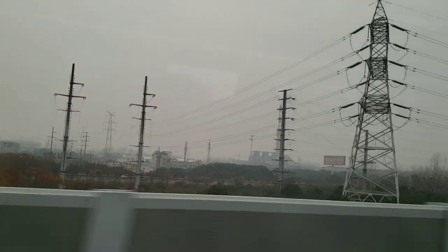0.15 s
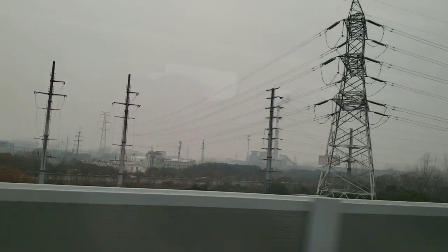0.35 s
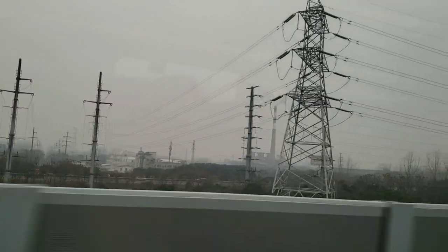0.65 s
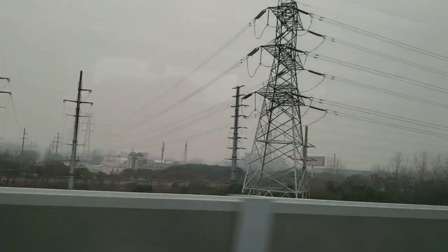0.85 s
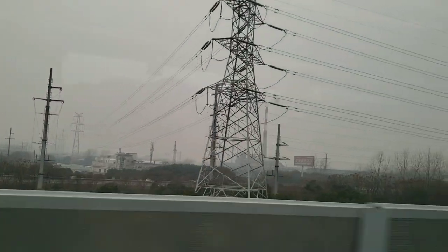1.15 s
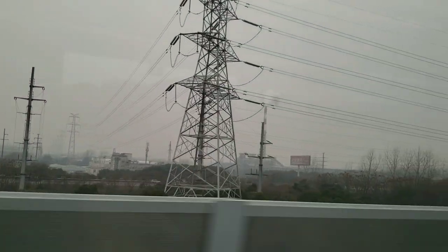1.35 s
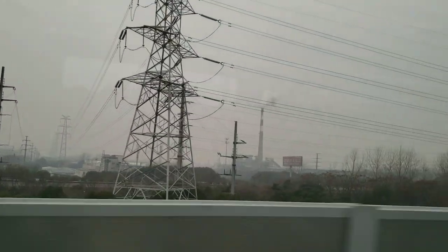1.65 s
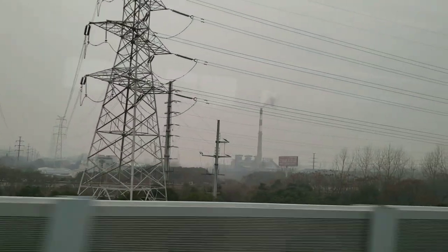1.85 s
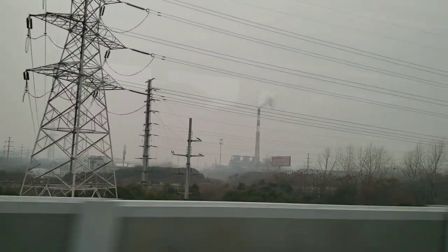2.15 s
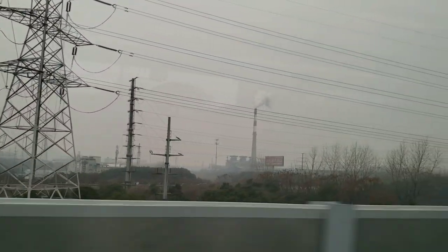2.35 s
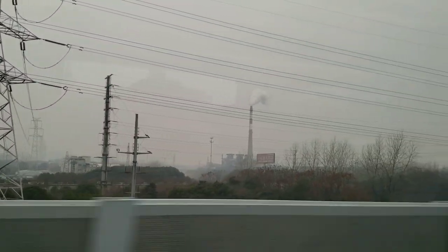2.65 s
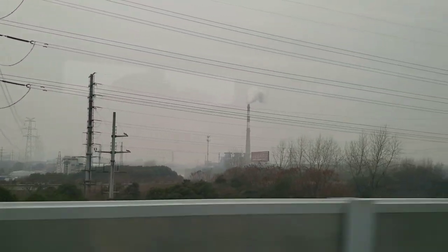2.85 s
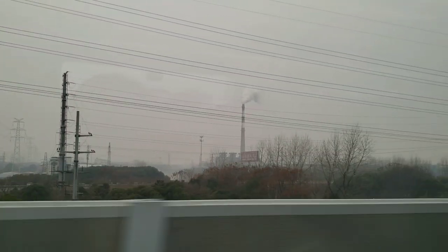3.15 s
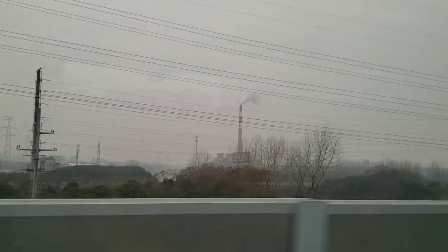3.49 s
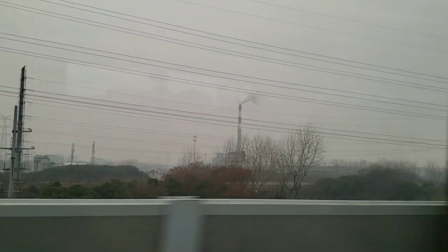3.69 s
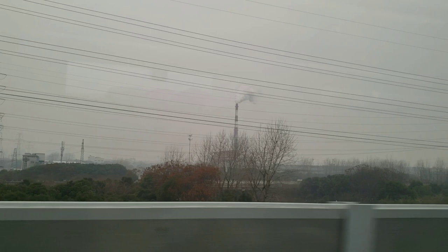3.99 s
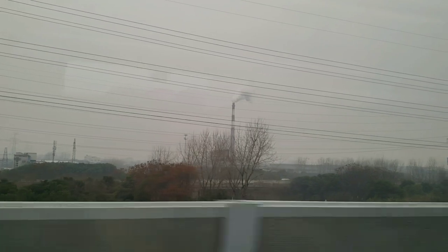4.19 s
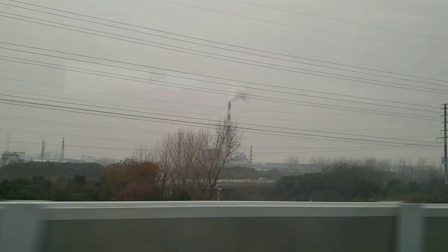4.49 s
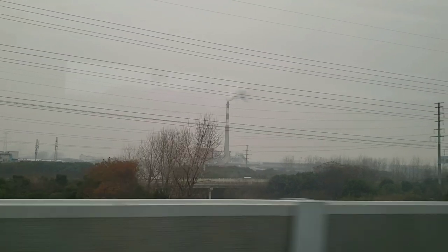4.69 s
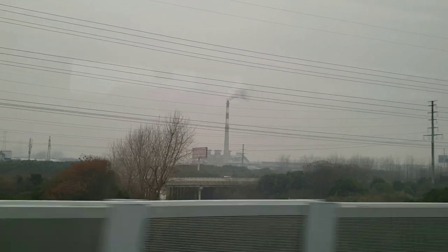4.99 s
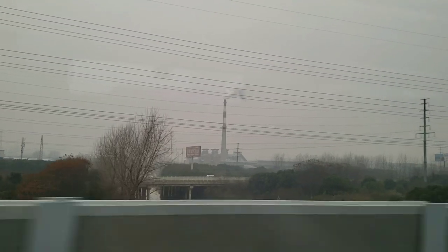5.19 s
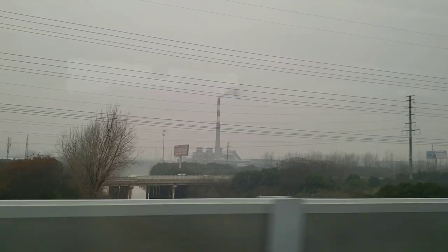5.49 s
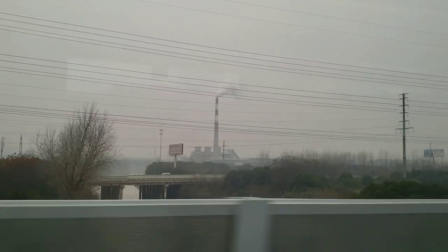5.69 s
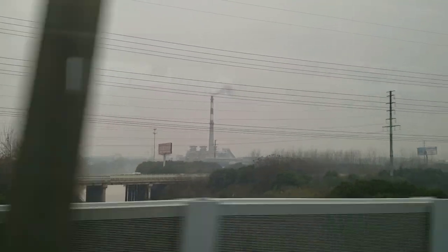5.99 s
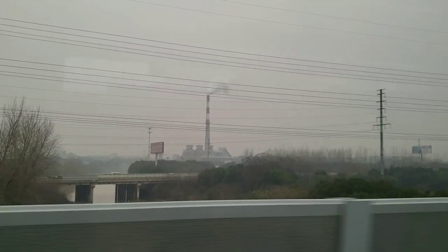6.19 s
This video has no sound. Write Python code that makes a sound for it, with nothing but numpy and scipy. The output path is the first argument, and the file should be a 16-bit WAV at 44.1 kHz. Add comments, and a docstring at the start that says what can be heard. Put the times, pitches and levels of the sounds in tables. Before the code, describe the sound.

A fast train rumbles steadily from inside with a faint whine, while a sleeve rubs and crackles close to the microphone.

```python
"""A high-speed train booms and roars, heard from inside as it crosses a viaduct and slows.
The track shakes the car body, wheel and air noise comes through the walls, the wheels hum and sing,
and the drive and a fan hum faintly. Close to a phone's right microphone a sleeve rubs, brushes
and squeaks as its fibres slip, and crackles as its creases give way. The phone takes one dull knock."""
import sys
import numpy as np
from scipy import signal
from scipy.fft import rfft, irfft
from scipy.io import wavfile
from scipy.ndimage import uniform_filter1d

SR = 44100
rng = np.random.default_rng(int(sys.argv[2]) if len(sys.argv) > 2 else 0)


def to_wav(sig):
    """Store sig (one row per channel, or 1-D mono) as 16-bit WAV at the path in sys.argv[1].

    Samples outside -1..1 are clipped; the rate is SR.
    """
    pcm = np.clip(np.atleast_2d(sig), -1, 1) * 32767
    pcm = np.round(pcm).astype(np.int16)
    wavfile.write(sys.argv[1], SR, pcm.T)  # frames by channels


N = 279594
TIME = np.arange(N) / SR
FREQ = np.maximum(np.arange(N // 2 + 1) * SR / N, 1)
TOP_HZ = 15800
TAUT_S, SLACK_S = 2.23, 4.97  # the cloth is pulled tight between these times

# How hard the sleeve slides. Each row: time in seconds, relative level in dB, brightness in dB.
SLEEVE_SLIDE = [(0, -64, -4.5), (.3, -61.5, 7), (.85, -63.5, 2), (1.05, -56, 4), (1.25, -62, 1),
                (1.9, -62, -0.5), (2.6, -55, -0.5), (2.83, -50.5, 0), (3.05, -54.5, 0), (3.23, -51.5, -2.5),
                (3.42, -44, -0.5), (3.57, -53.5, 0), (3.7, -54.5, -0.5), (4.25, -56, -1), (4.5, -55.5, 0),
                (5.15, -62, 0), (5.85, -58.5, 0.5), (6.34, -62.5, -3)]
# Tone of the tight cloth at the near (right) microphone. Each row: frequency in Hz, gain in dB.
TAUT_TONE = [(600, -0.5), (1600, -2.5), (2600, -6), (4800, -3), (6000, -4.5), (7000, -4), (7700, -2),
             (8400, -10.5), (9800, -8.5), (11000, 1), (13000, -0.5), (14000, -3.5), (15500, -12)]
# Tone of the cloth at the far (left) microphone. Each row: frequency in Hz, gain in dB.
FAR_TONE = [(700, 4), (1700, 1), (3000, 0.5), (4500, -3.5), (6300, -3), (7900, -2), (8600, -3.5),
            (12000, -6.5), (15500, -11)]
# Stiff folds that ring in tight cloth. Each row: pitch in Hz, width in Hz, relative level in dB.
STIFF_FOLDS = [(1790, 220, -19), (2460, 154, -15), (3210, 550, -12.5), (4420, 330, -15), (5250, 92, -19.5),
               (6800, 190, -18)]


def rumble(boom_below_hz=170, boom_db=-1.0, steadying=0.31, rush_db=0.5, ease_db_per_s=0.16):
    """Track and air shake the car; long waves reach both microphones alike, short ones from all sides."""
    # Wheel and air noise in the cabin. Each row: frequency in Hz, relative level in dB.
    roar = [(20, -39), (43, -68), (90, -54), (135, -53.5), (165, -62.5), (225, -70.5), (380, -70.5),
            (600, -81), (700, -81.5), (1150, -84.5), (1450, -90.5), (2500, -94.5), (3200, -102),
            (14000, -118)]
    # The low hum of the turning wheels (first row), then resonances of car body and cabin air.
    # Each row: pitch in Hz, width in Hz, relative level in dB.
    low_notes = [(36.9, 1.96, -42), (53, 6.3, -48), (57.9, 11.4, -45.5), (65.7, 12.7, -44.5),
                 (100, 12.3, -49), (114.7, 14, -44.5), (129, 7.2, -56), (181.3, 30.6, -60.5),
                 (250.7, 16.4, -67.5), (545, 43, -74), (602.4, 24, -73)]
    # Stereo spread. Each row: frequency in Hz, how alike the sides are (0-1), left minus right in dB.
    spread = [(35, 1, 4), (65, 0.92, 2.5), (125, 0.99, 1.35), (250, 0.94, 3.5), (510, 0.35, 1),
              (1030, 0, 1.5), (4020, 0, -1.5)]
    likeness, pan_db = over_frequency(spread)
    likeness = np.clip(likeness, 0, 1)
    sides = np.array([[1], [-1]])
    gain = np.hypot(undb(over_frequency(roar)[0]), peaks(low_notes)) * undb(sides * pan_db / 2)
    shared, opposite = rng.standard_normal((2, N)) * np.sqrt(SR / 2)
    cabin = shape(shared, gain * np.sqrt((1 + likeness) / 2))
    cabin = cabin + sides * shape(opposite, gain * np.sqrt((1 - likeness) / 2))
    boom = shape(cabin, 1 / (1 + (FREQ / boom_below_hz) ** 8))
    rush = cabin - boom
    # the boom holds fairly even by itself, but swells and sinks with the track
    loudness = np.sqrt(uniform_filter1d(np.mean(boom ** 2, axis=0), size=SR // 4))
    swell = undb(boom_db + track_db()) * (loudness.mean() / loudness) ** steadying
    # the rush of air eases as the train slows
    easing = undb(rush_db - ease_db_per_s * TIME + 0.5 * wander(0.91))
    return boom * swell + rush * easing


def track_db(bump_s=0.037):
    """How hard the track shakes the car: long smooth and rough stretches, and a swell at each bump."""
    # Roughness of the track. Each row: time in seconds, dB above or below the usual.
    roughness = [(0, 0.5), (.5, 1), (1.2, -0.3), (2.4, -2.5), (2.8, 1), (4.4, -2), (5.0, -1), (5.5, 1.2),
                 (6.34, -2)]
    # Uneven spots under the wheels. Each row: time in seconds, swell in dB.
    bumps = [(1.47, 3.5), (2.24, 7), (2.63, 4.5), (3.26, 6.5), (4.14, 4.5), (5.25, 3)]
    return over_time(roughness)[0] + sum(db * np.exp(-((TIME - s) / bump_s) ** 2) for s, db in bumps)


def drone(hz=59.12, usual_db=-37, waver_hz=0.55, throb_db=4.0, pan_db=4):
    """The running gear under the car throbs on one low note, louder on rough track."""
    tone = np.sin(2 * np.pi * np.cumsum(hz + waver_hz * wander(4.5)) / SR)
    throbbing = unit(tone * undb(throb_db * wander(4)))
    return throbbing * undb(usual_db + track_db() + np.array([[pan_db], [-pan_db]]) / 2)


def sleeve(slide_db=5, brush_db=3, uneven_db=1.1, rise=0.35, fade=3.04):
    """The sleeve hisses as it slides; each brush is a short surge of the same friction."""
    # Quick brushes. Each row: start and length in seconds, relative level in dB, brightness in dB.
    brushes = [(0.06, 0.11, -54.5, 0.5), (0.173, 0.078, -50, 0.5), (0.494, 0.05, -43, -2.5),
               (0.55, 0.066, -54, -7), (0.865, 0.035, -55, -8), (1.122, 0.083, -48, -4.5),
               (1.182, 0.027, -41, -3), (1.39, 0.048, -52, 6), (1.436, 0.049, -47.5, 5),
               (1.66, 0.15, -59, -1), (1.964, 0.15, -61, 12), (2.233, 0.15, -53, 5),
               (2.577, 0.029, -42.5, 0), (2.801, 0.12, -49, 6), (3.106, 0.17, -47, 4),
               (3.245, .035, -49.5, 2), (3.29, 0.048, -39.5, 0.5), (3.35, 0.094, -40, 1.5),
               (3.494, 0.073, -43, 0.5), (3.595, 0.11, -42.5, 4), (3.857, 0.058, -44, -1.5),
               (3.966, 0.077, -48, 4), (4.04, 0.035, -43, -3), (4.148, 0.025, -46, 3),
               (4.287, 0.037, -42.5, -3.5), (4.346, 0.038, -45.5, -9), (4.378, 0.028, -43.5, -5),
               (4.428, 0.066, -47, -2), (4.558, 0.1, -47.5, 2.5), (4.703, 0.037, -58, 17),
               (4.79, 0.059, -51.5, 2), (4.966, 0.071, -49, -1.5), (5.3, 0.076, -56, -5),
               (5.481, 0.031, -48, -12), (5.585, 0.041, -52, 1), (5.757, 0.11, -54, -3.5),
               (5.866, 0.043, -50.5, -2), (5.932, 0.022, -53, -1), (6.09, 0.068, -54.5, -7)]
    level_db, tilt_db = over_time(SLEEVE_SLIDE)
    power = undb(level_db + slide_db + uneven_db * wander(16)) ** 2
    weighted_tilt = power * tilt_db  # the strongest motion has the most say in the brightness
    for s, length, db, bright_db in brushes:
        start = int(s * SR)
        age = (TIME[start:start + SR // 2] - TIME[start]) / length
        dying = np.exp(-fade * np.maximum(age - rise, 0) ** 1.12)
        surge = np.minimum(age / rise, dying) * undb(db + brush_db) ** 2
        power[start:start + len(age)] += surge
        weighted_tilt[start:start + len(age)] += surge * bright_db
    return np.sqrt(power) * tilted(fibres(), weighted_tilt / power)


def fibres(slips_per_s=2000, slip_s=0.002, even_hiss=2.9, far_db=-7, far_crinkle_db=-5):
    """Countless tiny slips each make a puff of noise, whose tone depends on how the cloth lies."""
    # Tone of the loose cloth at the start. Each row: frequency in Hz, gain in dB.
    loose_tone = [(900, -14), (2200, -6), (3200, -12), (5800, -3.5), (6400, -10.5), (7100, -8.5),
                  (7900, -1), (8400, -4.5), (9300, -5), (9900, -1.5), (10600, -3), (11800, 1),
                  (13500, -4.5), (15500, -11)]
    # Tone of the cloth once it is slack again. Each row: frequency in Hz, gain in dB.
    slack_tone = [(900, -18), (1700, 1), (2900, -5.5), (4000, -2), (5600, -2), (7000, 2), (7600, -2.5),
                  (8400, -9), (9900, -6.5), (11400, 2), (12600, 0), (14000, -5), (15500, -11)]
    energy = signal.lfilter([1], [1, -np.exp(-1 / (slip_s * SR))], slips(slips_per_s, spread_db=2.5) ** 2)
    left, right = rng.standard_normal((2, N)) * np.sqrt(even_hiss + energy / energy.mean())
    loose, tight, slack = (coloured(right, tone) for tone in (loose_tone, TAUT_TONE, slack_tone))
    # the cloth is pulled tight at once and let go slowly; only tight folds crinkle
    gripped = np.clip((TIME - TAUT_S) * 20, 0, 1)
    released = np.clip((TIME - SLACK_S) * 2 + .5, 0, 1)
    taut = gripped - released
    near = loose * (1 - gripped) + (tight + crinkle()) * taut + slack * released
    far = undb(far_db) * coloured(left, FAR_TONE) + undb(far_crinkle_db) * crinkle() * taut
    return np.array([far, hollows(near)])


def slips(per_s, spread_db):
    """Cloth slips in random clicks, mostly small with a few large ones."""
    happens = rng.random(N) < per_s / SR
    return happens * undb(spread_db * np.minimum(rng.exponential(size=N), 2 * np.pi))


def crinkle(buckles_per_s=130, hardest_db=2, follow=0.59):
    """Each stiff fold buckles at random and rings briefly, loudest when the cloth slides hard."""
    rings = np.zeros(N)
    for hz, width, db in STIFF_FOLDS:
        fold = signal.iirpeak(hz, hz / width, fs=SR)
        rings += undb(db) * unit(signal.lfilter(*fold, slips(buckles_per_s, spread_db=3)))
    slide_db = over_time(SLEEVE_SLIDE)[0]
    return rings * undb(hardest_db + follow * (slide_db - slide_db.max()))


def hollows(hiss, depth_db=1.36, rate_hz=9, width_octaves=0.21):
    """Hollows in the moving cloth open and close, so each one's resonance comes and goes."""
    # Hollows over the microphone. Each entry: pitch in Hz.
    pitches = [2000, 2920, 4180, 6260, 7600, 10200, 13000]
    out = hiss.copy()
    for hz in pitches:
        band = shape(hiss, np.exp(-(np.log2(FREQ / hz) / width_octaves) ** 2))
        out += band * (unit(undb(depth_db * wander(rate_hz))) - 1)
    return out


def creases(attack_s=0.00085, decay_s=0.0045, middle_hz=5000, ring=0.49, far_db=-7):
    """A crease gives way with a tiny tick, coloured by the cloth and its ringing folds."""
    # The main snaps. Each row: start in seconds, relative level in dB, pitch in Hz, width in octaves.
    snaps = [(.879, -43, 2900, 0.98), (.893, -42, 8000, 1.5), (2.483, -43, 8000, 2.6),
             (2.4985, -35.5, 9000, 1.7), (2.522, -40, 4280, 0.64), (2.5745, -33, 4500, 2),
             (2.5801, -24, 15000, 1.9), (2.609, -37, 2900, .6), (2.712, -36, 9000, 1.6),
             (2.7651, -26, 6000, 3.6), (2.815, -34, 8000, 2), (2.855, -32, 9000, 1.6),
             (2.9148, -27.5, 7000, 1.6), (3.02, -32.5, 11500, 1.2), (3.061, -38, 4000, 1.2),
             (3.0843, -38, 3300, 1.1), (3.1302, -34.5, 3800, 1.2), (3.1846, -31, 3300, 1.3),
             (3.191, -26, 4000, 3.2), (3.2788, -25, 2900, 1.6), (3.293, -31, 3400, 1.3),
             (3.3035, -32.5, 3500, 2.8), (3.317, -21, 7500, 2.2), (3.3587, -28, 4200, 1.4),
             (3.383, -34, 5500, 2), (3.443, -26, 7000, 2.8), (3.479, -35, 4000, 1.4),
             (3.5033, -34, 4460, 1), (3.522, -31, 14500, .5), (3.636, -36, 4500, 1.6),
             (3.655, -32, 9000, 1.6), (3.917, -30, 3230, 0.29), (4.0511, -30, 3950, 2.4),
             (4.0625, -35, 3950, 2.3), (4.1394, -31.5, 4800, 3.5), (4.147, -35, 10000, 1.4),
             (4.2172, -39, 2970, 1), (4.2922, -29, 7500, 3.4), (4.302, -33, 10000, 1.6),
             (4.3524, -35, 3200, 1.8), (4.385, -44, 3600, 1.2), (4.435, -36, 5000, 2.5),
             (4.474, -33, 4000, 4), (4.581, -33, 7500, 2), (4.593, -35, 11000, 1.3), (4.622, -40, 12000, 1),
             (5.486, -42.5, 3500, 1.8), (5.598, -36, 5800, 1.1), (5.61, -37, 5500, 1.5),
             (5.722, -41, 6000, 2.8), (5.878, -41, 4300, 1.4), (5.988, -54, 4500, 2), (6.227, -49, 5000, 2)]
    out, t = np.zeros((2, N)), TIME[:SR // 20]
    for s, db, hz, octaves in list(snaps) + small_snaps():
        speed = (hz / middle_hz) ** 0.56  # higher ticks are quicker
        envelope = np.sqrt(speed) * np.exp(-speed * t / decay_s) * (1 - np.exp(-speed * t / attack_s))
        edge = 2 ** (octaves / 2)
        band = signal.butter(1, [hz / edge, min(hz * edge, TOP_HZ)], "band", fs=SR, output="sos")
        tick = unit(signal.sosfilt(band, rng.standard_normal((2, len(t))))) * envelope
        start = int(s * SR)
        out[:, start:start + len(t)] += undb(db) * tick[:, :N - start]
    cloth = undb([over_frequency(FAR_TONE)[0] + far_db, over_frequency(TAUT_TONE)[0]])
    folds = sum(resonance(hz, width) for hz, width, _ in STIFF_FOLDS)
    return shape(out, cloth * (1 + ring * folds))


def small_snaps(count=60, boost_db=9, scatter_db=2, low_hz=2000, high_hz=12000, octaves=1.4):
    """More rows of snaps: tight cloth ticks at random, more often and louder the harder it slides."""
    when, size, pitch = rng.random((count, 3)).T
    slide_db = over_time(SLEEVE_SLIDE)[0]
    strain = np.cumsum(undb(slide_db) * (TIME > TAUT_S) * (TIME < SLACK_S))
    starts = np.searchsorted(strain, when * strain[-1])
    db = slide_db[starts] + boost_db + scatter_db * (2 * size - 1)
    hz = low_hz * (high_hz / low_hz) ** pitch
    return list(zip(TIME[starts], db, hz, np.full(count, octaves)))


def squeaks(far_db=-6):
    """Now and then the cloth catches and rings one narrow resonance: a squeak or a hollow rub."""
    # Each row: start in seconds, length in seconds, pitch in Hz, width in Hz, level in dB.
    catches = [(0.168, 0.057, 7900, 1300, -48), (0.85, 0.016, 6200, 800, -53),
               (1.184, 0.025, 1250, 120, -48), (1.65, 0.073, 7940, 260, -53.5),
               (1.718, 0.076, 7900, 240, -59.5), (2.199, .009, 2520, 400, -45.5),
               (2.208, 0.17, 1930, 800, -49.5), (2.24, 0.13, 5530, 1200, -55.5),
               (3.142, .1, 3330, 170, -50.5), (3.25, 0.11, 2500, 200, -46), (3.98, .025, 7700, 400, -46),
               (4.437, 0.072, 670, 70, -46.5), (4.602, 0.053, 12200, 1100, -43), (5.86, .08, 715, 50, -50),
               (6.008, .032, 6300, 900, -57), (6.027, 0.037, 4360, 150, -61)]
    out = np.zeros((2, N))
    for s, length, hz, width, db in catches:
        swell = np.sin(np.pi * np.clip((TIME - s) / length, 0, 1))
        out += undb(db) * swell * stereo_noise(resonance(hz, width))
    return out * undb([[far_db], [0]])


def knock(at_s=3.4075, gain_db=-20, right_db=-2, contact_s=0.0014, shudder_db=-16, shudder_s=0.015):
    """A soft blow rings the phone's case and leaves a short, dull shudder."""
    # Notes of the case. Each row: pitch in Hz, relative level in dB, seconds to fade by 60 dB.
    case_notes = [(308, 0.5, 0.052), (342, 3.5, 0.029), (404, 0.5, 0.028), (476, -9, 0.031),
                  (572, -17, 0.05), (697, -17, 0.15)]
    t = np.maximum(TIME - at_s, 0)
    ring = sum(undb(db - 60 * t / fade_s) * np.sin(2 * np.pi * hz * t) for hz, db, fade_s in case_notes)
    shudder = undb(shudder_db) * np.exp(-t / shudder_s) * stereo_noise(resonance(hz=400, width=220))
    onset = 1 - np.exp(-t / contact_s)
    return undb([[gain_db], [gain_db + right_db]]) * (ring + shudder) * onset


def wheels():
    """Rolling on the rails keeps the wheels singing in a narrow band."""
    # Resonances of the wheels. Each row: pitch in Hz, width in Hz, relative level in dB.
    wheel_notes = [(1043, 44, -1), (1064, 18, 2.5), (1118, 28, -5), (980, 130, -12.5)]
    # How loudly they sing. Each row: time in seconds, level in dB.
    singing = [(0, -70), (1.8, -61), (3.0, -56), (3.85, -50.5), (4.1, -54.5), (4.7, -61.5), (6.34, -60)]
    return undb(over_time(singing)[0]) * stereo_noise(peaks(wheel_notes))


def drive(start_hz=1045, slowing_hz_per_s=13.5, motor_db=-59, motor_fade_db_per_s=4.5):
    """Gears, shaft and motor whine, and sink in pitch together as the train slows."""
    # Loudness of the meshing gear teeth. Each row: time in seconds, level in dB.
    gear_levels = [(0, -62.5), (1.2, -59.5), (2.6, -57), (3.65, -52.5), (4.0, -67), (6.34, -64)]
    # Loudness of the shaft, an octave lower. Each row: time in seconds, level in dB.
    shaft_levels = [(0, -68), (1.3, -57.5), (2.1, -55), (2.5, -65), (3.5, -61), (4, -74)]
    gear_hz = start_hz - slowing_hz_per_s * TIME
    gears = whine(gear_hz, over_time(gear_levels)[0], waver_hz=0.66, flutter=0.25)
    shaft = whine(gear_hz / 2, over_time(shaft_levels)[0], waver_hz=0.59, flutter=0.22)
    motor = whine(gear_hz * 3 / 4, motor_db - motor_fade_db_per_s * TIME, waver_hz=3.58, flutter=0.72)
    return gears + shaft + motor


def electronics(inverter_hz=920.3, inverter_db=-58.5, on_s=3.87, rise_s=0.11, step_hz=35.4, step_db=-8.5):
    """The power converter whines throughout; the inverter joins in with fainter tones on each side."""
    steady = dict(waver_hz=0.24, flutter=0.17, pan_db=2)  # both lie a little to the left
    inverter = sum(whine(inverter_hz + k * step_hz, inverter_db + step_db * abs(k), **steady)
                   for k in range(-2, 3))
    converter = whine(hz=941.7, db=-61, **steady)
    return converter + inverter * np.clip((TIME - on_s) / rise_s, 0, 1)


def fan(hz=355.5, start_db=-51, fade_db_per_s=2.5):
    """The cabin fan's unsteady hum slowly fades."""
    return whine(hz, start_db - fade_db_per_s * TIME, waver_hz=1.49, flutter=0.3)


def whine(hz, db, waver_hz, flutter, pan_db=0):
    """A nearly pure tone that crosses the cabin and flutters differently at each microphone."""
    phase = 2 * np.pi * np.cumsum(hz + waver_hz * wander(5.37)) / SR
    paths = np.array([np.exp(1j * side) + flutter * (wander(20) + 1j * wander(28)) for side in range(2)])
    return undb(db + np.array([[pan_db], [-pan_db]]) / 2) * unit(np.real(paths * np.exp(1j * phase)))


def undb(db):
    """Turn decibels into a gain."""
    return 10 ** (np.asarray(db) / 20)


def unit(x):
    """Scale to an average (rms) level of 1."""
    return x / np.sqrt(np.mean(x ** 2))


def over_time(rows):
    """Join a table's points with straight lines in time, one curve per value column."""
    s, *columns = np.transpose(rows)
    return [np.interp(TIME, s, column) for column in columns]


def over_frequency(rows):
    """Join a table's points with straight lines on an octave scale, one curve per value column."""
    hz, *columns = np.transpose(rows)
    return [np.interp(np.log(FREQ), np.log(hz), column) for column in columns]


def shape(x, gain):
    """Filter with one gain for each frequency."""
    return irfft(rfft(x) * gain, N)


def coloured(x, tone):
    """Filter by a tone table and scale to level 1."""
    return unit(shape(x, undb(over_frequency(tone)[0])))


def tilted(x, tilt_db, split_hz=6500):
    """Make a sound brighter (positive tilt) or duller (negative tilt)."""
    low = shape(x, 1 / (1 + (FREQ / split_hz) ** 4))
    leaning = low * undb(-tilt_db) + (x - low) * undb(tilt_db)
    return leaning / np.sqrt((undb(2 * tilt_db) + undb(-2 * tilt_db)) / 2)


def resonance(hz, width):
    """Gain of a steep-sided peak, 1 at its centre."""
    return 1 / (1 + ((FREQ ** 2 - hz ** 2) / (FREQ * width * np.pi / 2)) ** 2)


def peaks(rows):
    """Gain of several peaks whose powers add up."""
    return np.sqrt(sum((undb(db) * resonance(hz, width)) ** 2 for hz, width, db in rows))


def stereo_noise(gain):
    """Filtered noise at level 1, different on each side."""
    return unit(shape(rng.standard_normal((2, N)), gain))


def wander(rate_hz):
    """A smooth random drift with a typical size of 1."""
    return unit(shape(rng.standard_normal(N), np.exp(-(FREQ / rate_hz) ** 2)))


def scene():
    """The train all around, the sleeve and the knock close by."""
    train = rumble() + drone() + drive() + electronics() + wheels() + fan()
    return train + sleeve() + squeaks() + creases() + knock()


def record(dry, low_hz=32):
    """The phone cuts the deepest bass and the highest treble."""
    bass_cut = shape(dry, 1 / np.sqrt(1 + (low_hz / FREQ) ** 12))
    return signal.sosfilt(signal.ellip(10, .1, 80, TOP_HZ, fs=SR, output="sos"), bass_cut)


dry = scene()
out = record(dry)
to_wav(out)
```